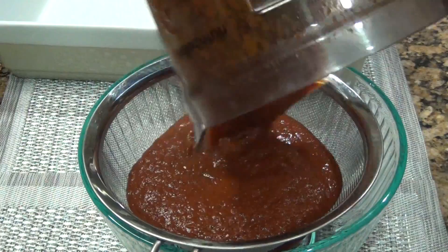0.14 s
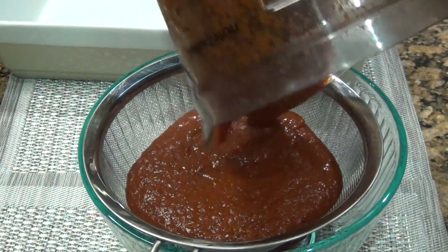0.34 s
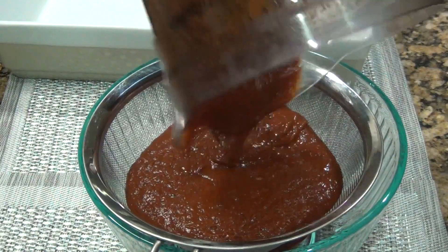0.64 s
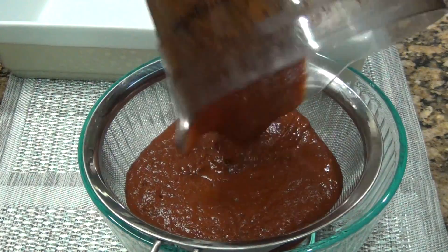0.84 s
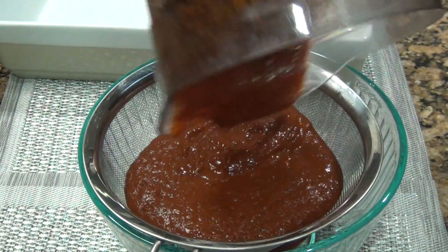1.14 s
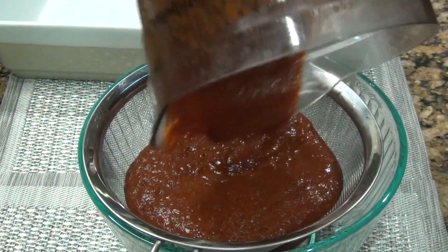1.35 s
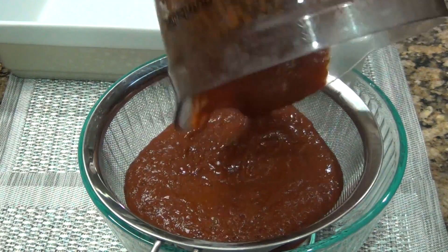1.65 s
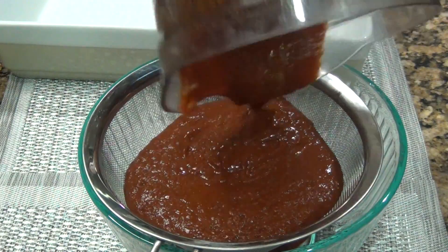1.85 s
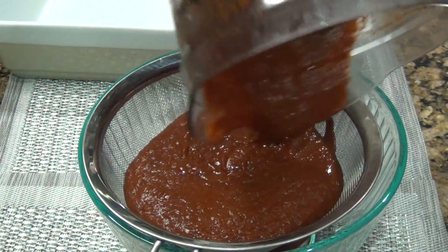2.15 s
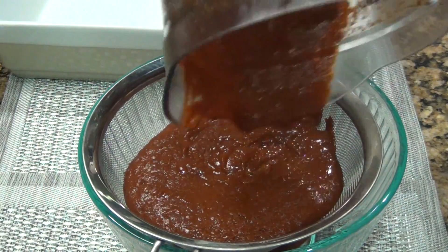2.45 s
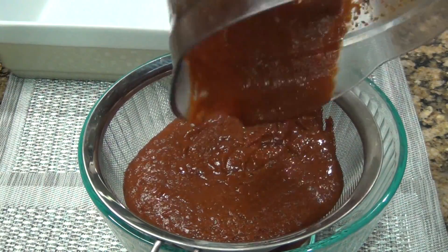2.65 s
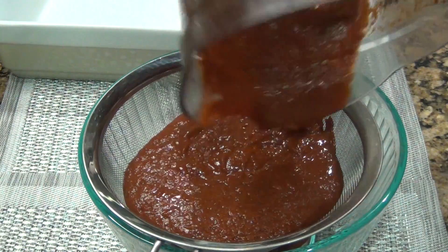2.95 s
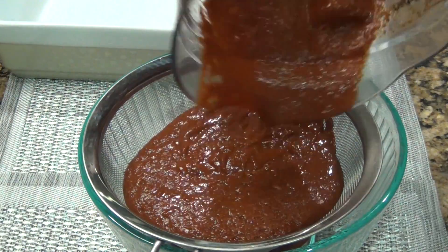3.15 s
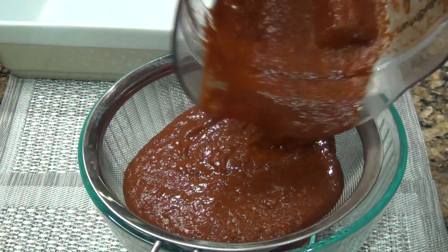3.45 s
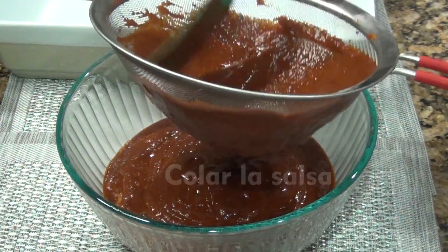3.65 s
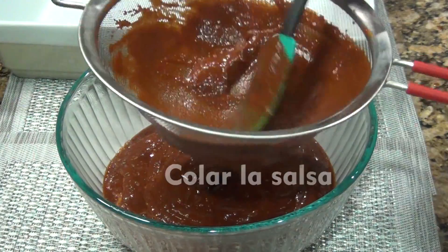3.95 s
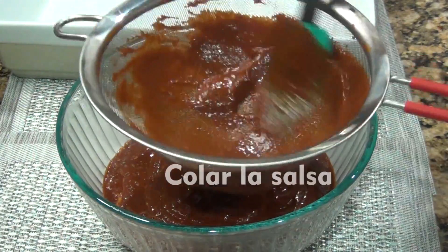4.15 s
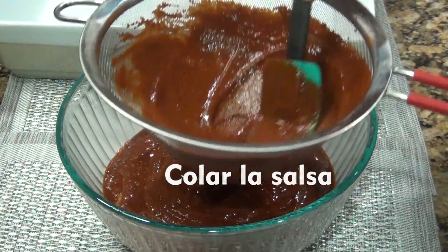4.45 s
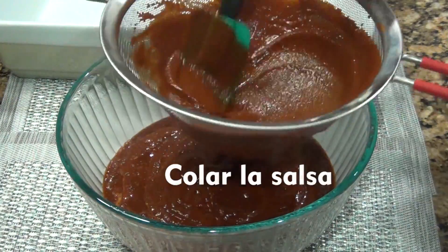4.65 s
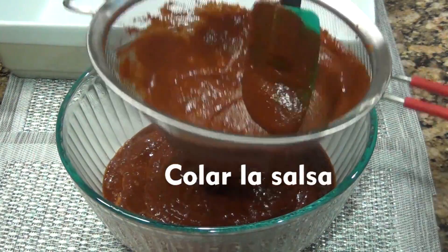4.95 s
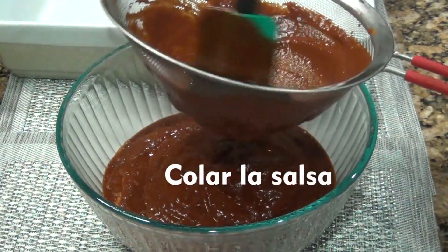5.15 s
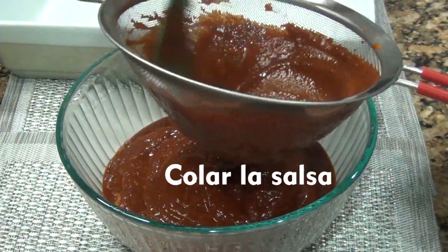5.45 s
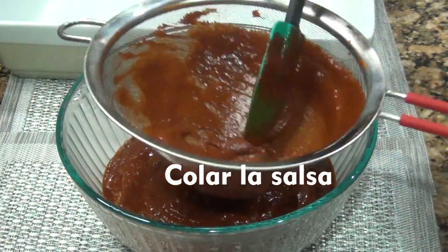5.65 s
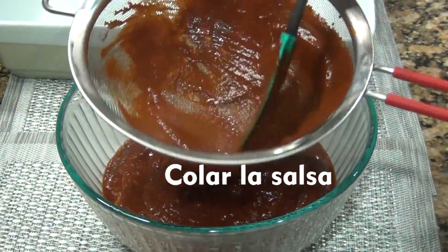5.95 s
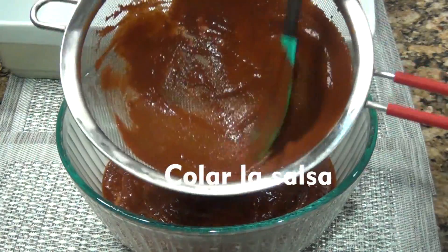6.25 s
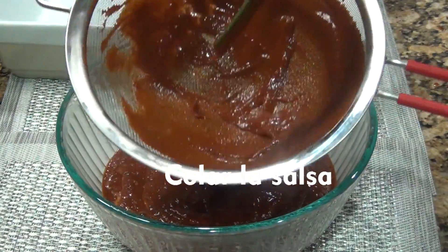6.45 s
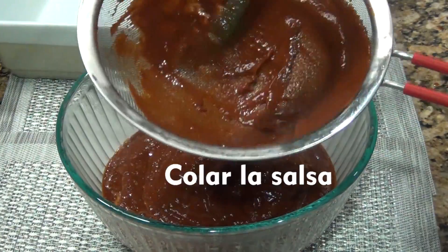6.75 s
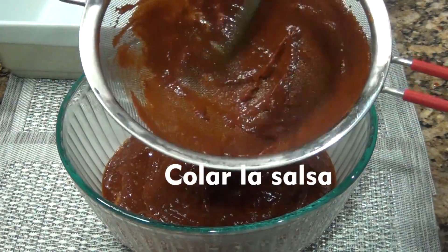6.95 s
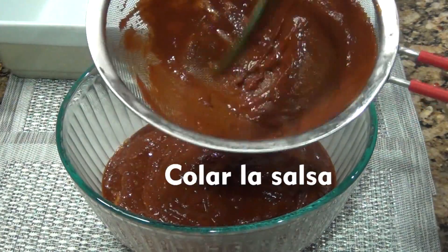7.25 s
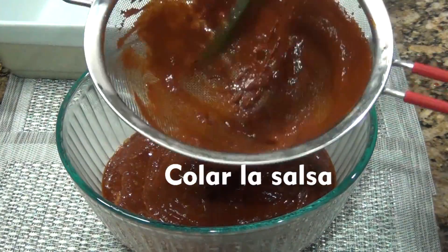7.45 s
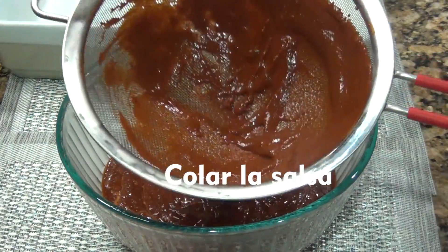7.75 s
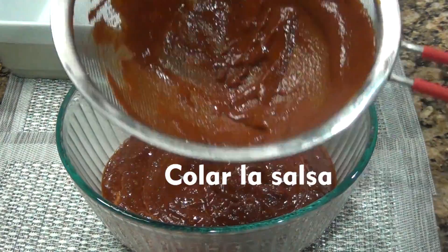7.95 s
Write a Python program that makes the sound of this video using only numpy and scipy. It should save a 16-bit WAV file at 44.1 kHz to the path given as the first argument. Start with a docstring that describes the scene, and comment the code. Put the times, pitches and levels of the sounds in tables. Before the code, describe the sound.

In a small kitchen with a low fan running, a plastic jar of thick sauce is shaken with soft flutters, hollow thumps and quick regular knocks, sauce sloshing and crackling inside. Then a spatula scrapes wetly across a wire strainer in short uneven strokes with fizzing and sticky pops. Finally it raps the metal rim five times, loud and evenly spaced, with brief room echoes. Close microphone.

```python
"""In a small kitchen, thick sauce is shaken out of a plastic blender jar into a wire strainer over a bowl.
The jar knocks and thumps: damped wall modes and a pumped air note; slosh and crackle are resonated noise and clicks.
A spatula rubs the sauce through the mesh in wet strokes, made of click trains under a pressure curve,
and is rapped five times on the rim, which rings in damped modes. A fan runs: coloured noise, duct modes and hum.
Diffuse echoes surround the near sounds; the recorder's gain control turns the level down at the raps."""
import sys
import numpy as np
from scipy import signal
from scipy.fft import rfft, irfft, next_fast_len
from scipy.io import wavfile
from scipy.ndimage import uniform_filter1d, minimum_filter1d

SR = 44100
rng = np.random.default_rng(int(sys.argv[2]) if len(sys.argv) > 2 else 0)


def file_out(sig):
    """Save sig as 16-bit WAV at sys.argv[1]."""
    # one column per channel
    cols = np.atleast_2d(sig).T
    # limit, then scale
    lim = np.clip(cols, -1, 1)
    pcm = np.round(lim * 32767).astype(np.int16)
    wavfile.write(sys.argv[1], SR, pcm)


N = 356769
TIME = np.arange(N) / SR
# the spatula works the sauce between these times
STIR_START_S, STIR_END_S = 3.54, 6.33

# ring of the jar's wall: pitch_hz, level_db
JAR_MODES = [(400, -13.5), (640, -14.5), (938, -3), (1340, -18.5), (1550, -16.5), (1930, -23), (2200, -42)]
# the jar knocks once per shake: start_s, level_db
KNOCKS = [(.749, -39.5), (0.937, -38), (1.12, -30.5), (1.308, -30), (1.493, -32), (1.677, -38.5),
          (1.857, -37), (2.032, -29), (2.212, -31.5), (2.398, -33), (2.583, -29.5), (2.756, -34.5),
          (2.936, -37), (3.127, -43.5)]


def knocks():
    """Modal impact: each shake ends in a gritty contact and a short hollow ring of the jar's wall modes."""
    out, t = np.zeros(N), TIME[:SR // 20]
    grit_spectrum = [(600, 6), (2100, 3.5), (3000, -5.0), (8000, -20.5)]  # (Hz, dB)
    for s, db in KNOCKS:
        ring = np.zeros(len(t))
        for hz, level in JAR_MODES:
            # every blow excites and tunes the modes slightly differently
            level_chance, pitch_chance, phase = rng.standard_normal(3)
            mode = np.sin(2 * np.pi * hz * (1 + 0.009 * pitch_chance) * t + phase)
            ring += from_db(level + 2.9 * level_chance) * mode
        ring = ring * choked(t, 0.016, rise=0.16, fall=0.45)
        grit = noise(grit_spectrum, size=len(t)) * choked(t, .012, rise=0.098, fall=0.99)
        add(out, s, from_db(db) * (ring + from_db(-16) * grit))
    return out


# soft blows on the jar: start_s, level_db, pitch_hz of the air note, length_s, rattle_db re level
THUMPS = [(0.017, -48, 400, 0.016, -16), (0.423, -43, 406, 0.025, -21), (0.797, -21.5, 404, 0.032, -12),
          (1.079, -36, 332, 0.017, -7.5), (3.187, -27.5, 435, 0.044, -3),
          (3.388, -21.5, 410.5, 0.024, -13.5)]
# the jar is first rocked gently and evenly; its air is pumped at every turn
ROCK_START_S, ROCK_TURN_S, ROCK_DB = .073, .098, -49
# once it knocks, it swings back a little after each knock but the last
BACKSWING_S, BACKSWING_DB = 0.11, -48
# the soft thump of a turn
TURN_HZ, TURN_LENGTH_S, TURN_RATTLE_DB = 400, .021, -4


def jar_blows():
    """Sequence of excitations: the firm blows, and a soft one at each turn of the shaken jar."""
    rocking = [(ROCK_START_S + k * ROCK_TURN_S, ROCK_DB) for k in range(7)]
    backswings = [(s + BACKSWING_S, BACKSWING_DB) for s, _ in KNOCKS[:-1]]
    return THUMPS + [(s, db, TURN_HZ, TURN_LENGTH_S, TURN_RATTLE_DB) for s, db in rocking + backswings]


def thumps():
    """Cavity resonance: a soft blow rattles the jar and pumps its air, whose note sags and leaves a hollow ring."""
    out, t = np.zeros(N), TIME[:SR // 4]
    # spectra (Hz, dB)
    hollow_spectrum = [(360, -24.5), (420, 1.5), (490, 1.5), (560, -12.5), (700, -21.5)]
    thud_spectrum = [(40, -21.5), (75, -8.0), (110, 8.5), (160, -13.5), (215, 4.5), (280, -7.5)]
    rattle_spectrum = [(350, -0.5), (520, 4.5), (650, 1.5), (900, -4.5), (1200, 0.5), (1550, -7.0),
                       (1950, -5.5), (2800, -16.0), (8000, -30.5)]
    for s, db, hz, length, rattle_db in jar_blows():
        # the pitch glides from 1.16 to 0.97 of the listed one
        phase = 2 * np.pi * np.cumsum(hz * (0.97 + 0.19 * np.exp(-t / 0.0042))) / SR
        note = 1.05 * np.sin(phase) * choked(t, length, rise=0.36, fall=0.31)
        hollow = noise(hollow_spectrum, size=len(t)) * np.exp(-t / 0.058) * np.minimum(t / length, 1)
        thud = noise(thud_spectrum, size=len(t)) * choked(t, 0.05, rise=0.11, fall=0.61)
        rattle = noise(rattle_spectrum, size=len(t)) * choked(t, length * 0.67, rise=0.19, fall=0.7)
        blow = note + from_db(-14.0) * hollow + from_db(-26.5) * thud + from_db(rattle_db) * rattle
        add(out, s, from_db(db) * blow)
    return out


# slosh inside the jar: start_s, level_db
SLOSH = [(0, -66.5), (1.0, -58), (2.8, -60.5), (3.5, -61.5), (3.55, -90)]
# turns of the shaken jar, and the time of one of them
TURNS_PER_S, FULL_SWING_S = 10.95, 1.32
# sauce creeping from the jar crackles less and less as it empties; the level is that at 0 s
OOZE_DB, OOZE_FADE_DB_PER_S = -70.5, 6
# one big lump slides off: its middle, half its length, its swish and its crackle
LUMP_S, LUMP_HALF_S, LUMP_SWISH_DB, LUMP_CRACKLE_DB = 0.73, 0.081, -59.5, -66.5


def pouring():
    """Amplitude modulation: sauce sloshes and glugs with each turn, crackles creeping out, and a lump swishes off."""
    swing = 1 + .7 * np.cos(2 * np.pi * TURNS_PER_S * (TIME - FULL_SWING_S))
    slosh = rms_one(resonate(resonate(rng.standard_normal(N), 390, 53), 448, 120))
    glugs = from_db(-3.5) * squelches(per_s=70, cycles=17)
    moving = gains(SLOSH)[0] * (slosh + glugs) * swing
    lump = np.exp(-((TIME - LUMP_S) / LUMP_HALF_S) ** 2)
    swish_spectrum = [(2500, -10), (4200, -2), (6000, -13.5), (14000, -16)]  # (Hz, dB)
    swish = from_db(LUMP_SWISH_DB) * noise(swish_spectrum) * lump
    ooze = from_db(OOZE_DB - OOZE_FADE_DB_PER_S * TIME) * (TIME < STIR_START_S)
    crackle = (ooze + from_db(LUMP_CRACKLE_DB) * lump) * wet_crackle(per_s=280, spread_db=3.5, cycles=5)
    return moving + crackle + swish


# spectrum of the wet fizz: pitch_hz, level_db
FIZZ = [(1500, -8), (3000, 8.5), (5000, 2.5), (8000, 3.5), (11500, -1.5), (13000, -9.5), (16000, -18)]


def wet_crackle(per_s, spread_db, cycles):
    """Impulsive excitation: tiny films of sauce snap, each at one of twelve pitches; rms 1."""
    return colour(pitched_clicks(grains(per_s, spread_db), np.geomspace(2500, 14000, 12), cycles), FIZZ)


# spectrum of the rub on the mesh: pitch_hz, level_db
RUB = [(200, -32.5), (350, -10), (570, -8.5), (870, 1), (1060, -1.5), (1380, -5.5), (1950, -9),
       (2550, -16.5), (3300, -17.5), (5000, -25), (8000, -36.5)]


def squelches(per_s, cycles):
    """Bubble resonance: air pockets in the sauce pop with short low notes; rms 1."""
    return colour(pitched_clicks(grains(per_s, spread_db=1.5), np.geomspace(400, 2400, 14), cycles), RUB)


# a stroke bites, eases as the sauce gives way, and lets go
STROKE_ATTACK_S, STROKE_SAG_DB_PER_S, STROKE_RELEASE_DB_PER_S = 0.027, 21, 229


def pressure(start, length):
    """Force envelope of one stroke: a smooth rise, a slow sag, a quick release."""
    t = np.maximum(TIME - start, 0)
    rise = np.sin(np.pi / 2 * np.minimum(t / STROKE_ATTACK_S, 1)) ** 2
    return rise * from_db(-STROKE_SAG_DB_PER_S * t - STROKE_RELEASE_DB_PER_S * np.maximum(t - length, 0))


# spectrum of the flexing basket: pitch_hz, level_db
PUSH = [(90, -24), (180, -9.5), (330, 1.5), (480, 2.5), (700, -2)]
# spatula strokes: start_s, length_s, rub_db on the mesh, push_db on the basket, fizz_db of the wet sauce
STROKES = [(3.685, .06, -41, -47.5, -51), (3.741, .078, -36, -54, -56.5), (3.956, .04, -54, -55.5, -67),
           (4.165, 0.12, -40, -68, -58), (4.296, 0.084, -45, -61, -57), (4.423, 0.06, -43, -62, -55.5),
           (4.567, .11, -41.5, -61.5, -55), (4.784, 0.067, -53, -64, -60.5), (5.177, 0.11, -53.5, -59, -62),
           (5.255, 0.23, -45.5, -56.5, -59), (5.491, .175, -41, -53, -58.5),
           (5.888, 0.055, -34.5, -57, -50.5), (5.95, 0.036, -43, -61, -66), (6.203, 0.058, -39, -59, -55)]
# between strokes the blade slides lightly through the sauce
STIR_RUB_DB, STIR_FIZZ_DB = -61, -72


def strokes():
    """Friction excitation: the blade skips over wires, flexes the basket and squeezes sauce and air through holes."""
    # strokes that overlap add in power
    power = sum(np.outer(from_db(levels), pressure(s, length)) ** 2 for s, length, *levels in STROKES)
    rub, push, fizz = np.sqrt(power)
    stirring = during(STIR_START_S, STIR_END_S, fade=.03)
    rub = np.hypot(rub, from_db(STIR_RUB_DB) * stirring)
    fizz = np.hypot(fizz, from_db(STIR_FIZZ_DB) * stirring)
    grip = from_db(1.1 * drift(70))
    skips = from_db(-5.0) * colour(grains(per_s=2500, spread_db=2.5), RUB)
    wires = skips + from_db(-7.5) * squelches(per_s=260, cycles=18)
    basket = colour(grains(per_s=900, spread_db=3.5), PUSH)
    spit = wet_crackle(per_s=2800, spread_db=2.6, cycles=4)
    return grip * (rub * wires + push * basket + fizz * spit)


# spatula bumps and catches on the mesh: start_s, level_db, decay_s to 1/e, treble_db re level
BUMPS = [(3.538, -33.5, 0.012, -14), (3.548, -33, 0.014, -26), (3.6933, -34.5, 0.0014, -22),
         (3.706, -27.5, 0.00065, 2), (3.72, -41, 0.008, 0.5), (3.762, -35, 0.0037, -6),
         (4.268, -39.5, .008, -15), (4.806, -42.5, 0.025, -11.5), (5.531, -41, .016, -22),
         (5.693, -39.5, 0.0053, -22), (5.861, -36.5, 0.0023, -25), (5.882, -36, 0.0028, -24),
         (6.155, -40, 0.0028, -15)]


def bumps():
    """Stick and release: the blade catches and lets go in a burst of the rub's spectrum, dying fast."""
    out, t = np.zeros(N), TIME[:SR // 6]
    for s, db, decay, treble_db in BUMPS:
        burst = noise(RUB, size=len(t)) + from_db(treble_db) * noise(FIZZ, size=len(t))
        add(out, s, from_db(db) * burst * np.exp(-t / decay))
    return out


# the larger sticky bubbles burst: start_s, level_db, pitch_hz
POPS = [(0.5865, -44, 5770), (0.6843, -45, 4360), (1.6924, -40, 4680), (2.031, -46, 4660),
        (2.161, -44, 6130), (2.5584, -42, 6300), (2.708, -46, 4440), (3.195, -34.5, 4380),
        (3.357, -44, 8000), (4.0022, -38, 7700), (4.0573, -39.5, 3840), (4.1025, -42.5, 4200),
        (4.3273, -44, 3640), (4.395, -46, 11100), (4.4964, -34, 5900), (4.7398, -39, 3580),
        (5.1565, -42.5, 3510), (5.8062, -44.5, 10100), (6.2734, -40.5, 5840)]


def pops():
    """Bubble burst: a tick around the bubble's own pitch and a few rising cycles."""
    out, t = np.zeros(N), TIME[:SR // 40]
    for s, db, hz in POPS:
        chirp = np.sin(2 * np.pi * hz * t * (1 + 5 * t)) * np.exp(-t / 0.002)
        tick = rms_one(resonate(rng.standard_normal(len(t)), hz, 0.65 * hz)) * np.exp(-t / 0.0025)
        add(out, s, from_db(db) * (.5 * chirp + 0.55 * tick))
    return out


# tiny bubbles burst at random until the stirring ends; the level is that at 0 s
TICKS_PER_S, TICKS_DB, TICKS_FADE_DB_PER_S = 14, -71, 2.8


def ticks():
    """Random point process: tiny bubbles burst one by one, high, and fainter as the froth is used up."""
    clicks, dealt = grains(TICKS_PER_S, spread_db=1.5), rng.integers(0, 6, N)
    pitches = np.geomspace(4000, 13000, 6)
    snaps = sum(resonate(clicks * (dealt == k), hz, 1500) for k, hz in enumerate(pitches))
    return from_db(TICKS_DB - TICKS_FADE_DB_PER_S * TIME) * rms_one(snaps) * (TIME < STIR_END_S)


# damped ring of rim and spatula, over the longer low swing of the handle: pitch_hz, width_hz, level_db
RIM_MODES = [(80, 29, -5), (150, 20, -0.5), (316, 39, 2), (673, 350, -3), (1200, 410, 4), (1820, 430, 1.5),
             (2850, 890, -7), (3700, 330, 0), (4730, 760, -1.5), (6650, 1250, 1), (8160, 1100, 1.5),
             (11230, 2400, -7)]
# spectrum of the short noise burst that smears the direct crack: pitch_hz, level_db
CRACK = [(100, -1), (8000, 1.5), (12000, 2), (16000, 4)]
# raps on the rim: start_s, level_db of the blow, clack_db added to the spatula's middle modes
RAPS = [(6.6402, 17, -8), (6.8472, 14, -2.5), (7.0414, 14.5, -1), (7.2197, 16.5, -2), (7.4145, 15, -2.5)]


def raps():
    """Impulse response of damped modes: the clean crack, and the crack smeared by a short noise burst for the
    direct sound."""
    clean, chattering, t = np.zeros(N), np.zeros(N), TIME[:SR // 8]
    impulse = 1.0 * (t == 0)
    for s, db, clack_db in RAPS:
        crack = np.zeros(len(t))
        for k, (hz, width, level) in enumerate(RIM_MODES):
            # the spot that lands on the rim decides how much the middle modes speak
            gain = from_db(db + level + clack_db * (1000 < hz < 2500))
            crack += (-1) ** k * gain * resonate(impulse, hz, width)
        chatter = noise(CRACK, size=len(t)) * np.exp(-t / .0019)
        add(clean, s, from_db(3) * crack)
        add(chattering, s, signal.fftconvolve(crack, chatter / np.linalg.norm(chatter)))
    return clean, chattering


# spectrum of the fan's air: pitch_hz, level_db
AIR = [(18, -52.5), (30, -13.5), (71, -6.5), (252, -7), (374, -7.5), (461, -2), (844, 0), (1160, -7.5),
       (1320, 2.5), (1460, -9.5), (1860, 0), (2230, -9), (3310, -11.5), (14000, -19), (16000, -23)]
# level of the fan's air over time: start_s, level_db
AIR_LEVEL = [(0, -57), (3.5, -59), (3.6, -56), (6.5, -58.5), (8.09, -58)]
# duct resonances: pitch_hz, width_hz, level_db
FAN_MODES = [(845, 28, -65), (1084, 89, -68), (1309, 120, -60.5), (1815, 230, -66.5), (3266, 65, -73.5)]
# mains hum: pitch_hz, level_db
HUM = [(60, -81), (120, -80)]


def background():
    """Broadband flow noise with duct resonances, mains hum and, from 3.54 s, a thin wavering whine."""
    air = gains(AIR_LEVEL)[0] * noise(AIR)
    duct = sum(from_db(db) * rms_one(resonate(rng.standard_normal(N), hz, width)) for hz, width, db in FAN_MODES)
    hum = sum(from_db(db) * np.sin(2 * np.pi * hz * TIME) for hz, db in HUM)
    whine_hz = np.interp(TIME, [3.54, 8], [14580, 14200]) + 60 * drift(9) + 170 * drift(900)
    whine = from_db(-72.5) * (TIME > 3.54) * np.sin(2 * np.pi * np.cumsum(whine_hz) / SR)
    return air + duct + hum + whine


# reverberation of the room: pitch_hz, t60_s, echo_db
KITCHEN = [(151.4, 0.65, -14), (400, 0.53, -9), (1000, 0.42, -9.5), (2500, 0.4, -10), (6020, 0.4, -8),
           (8970, 0.33, -13), (14000, 0.18, -10.5)]


def kitchen(x):
    """Diffuse reverberation: echoes arrive a few milliseconds late and die band by band."""
    t, response = TIME[:SR // 2], 0
    hz, t60, echo_db = np.transpose(KITCHEN)
    edges = 60 * 2 ** np.arange(0, 8.5, 2 / 3)  # bands of two thirds of an octave
    for low, high in zip(edges, edges[1:]):
        centre = np.log(low * high) / 2
        band_filter = signal.butter(2, [low, high], "band", fs=SR, output="sos")
        band = signal.sosfilt(band_filter, rng.standard_normal(len(t)))
        tail = band * from_db(-60 * t / np.interp(centre, np.log(hz), t60)) * (t > .005)
        # energy in proportion to bandwidth
        even = np.sqrt(2 * (high - low) / SR / np.sum(tail ** 2))
        response = response + tail * from_db(np.interp(centre, np.log(hz), echo_db)) * even
    return signal.fftconvolve(x, response)[:N]


def from_db(db):
    """Logarithmic level: decibels to gain."""
    return 10 ** (np.asarray(db) / 20)


def rms_one(x):
    """Power normalisation: scale to rms 1."""
    return x / np.sqrt(np.mean(x ** 2) + 1e-20)


def gains(rows):
    """Level interpolation: one gain curve per dB column, practically silent outside the rows."""
    s, *columns = np.transpose(rows)
    return [from_db(np.interp(TIME, s, c, left=-150, right=-150)) for c in columns]


def colour(x, spectrum):
    """Spectral shaping: filter by a spectrum that falls 20 dB per octave beyond its ends; rms 1."""
    hz, db = np.transpose(spectrum)
    size = next_fast_len(len(x))
    octave = np.log2(np.fft.rfftfreq(size, 1 / SR) + 1)
    beyond = np.abs(octave - np.clip(octave, np.log2(hz[0]), np.log2(hz[-1])))
    shape = from_db(np.interp(octave, np.log2(hz), db) - 20 * beyond)
    return rms_one(irfft(rfft(x, size) * shape, size)[:len(x)])


def noise(spectrum, size=N):
    """Filtered white noise, rms 1."""
    return colour(rng.standard_normal(size), spectrum)


def drift(rate):
    """Slow random modulation of rms 1, with rate knots per second."""
    knots = rng.standard_normal(int(N / SR * rate) + 2)
    return rms_one(np.interp(TIME * rate, np.arange(len(knots)), knots))


def resonate(x, hz, width_hz):
    """Damped oscillator: one two-pole resonance with gain 1 on top."""
    r = np.exp(-np.pi * width_hz / SR)
    zeros = np.array([1, 0, -1]) * (1 - r * r) / 2
    poles = [1, -2 * r * np.cos(2 * np.pi * hz / SR), r * r]
    return signal.lfilter(zeros, poles, x + 1e-18)


def grains(per_s, spread_db):
    """Random impulse train: clicks of very uneven size and either sign."""
    sizes = from_db(spread_db * np.minimum(rng.exponential(1, N), 4))
    return (rng.random(N) < per_s / SR) * sizes * rng.choice([-1, 1], N)


def pitched_clicks(clicks, pitches, cycles):
    """Resonator bank: each click is dealt to one pitch; width is the pitch over cycles."""
    dealt = rng.integers(0, len(pitches), N)
    return sum(resonate(clicks * (dealt == k), hz, hz / cycles) for k, hz in enumerate(pitches))


def add(out, s, sound):
    """Superposition: mix a sound in at time s."""
    at = int(s * SR)
    out[at:at + len(sound)] += sound[:N - at]


def choked(t, length, rise, fall):
    """Damped envelope: swells, sags, then is stopped by hand and sauce; rise and fall are shares of length."""
    u = t / length
    swell = np.sin(np.pi / 2 * np.clip(u / rise, 0, 1)) ** 2
    return swell * np.clip((1 - u) / fall, 0, 1) * np.exp(-.4 * u)


def during(start, end, fade):
    """Gating: 1 between two times, with a short fade inside each end."""
    return np.clip(np.minimum(TIME - start, end - TIME) / fade, 0, 1)


def scene():
    """Superposition of direct sound, room echoes and background."""
    near = thumps() + knocks() + pouring() + strokes() + bumps() + pops() + ticks()
    clean_raps, chattering_raps = raps()
    return (near + chattering_raps + kitchen(near + clean_raps) + background())[None]


def gain_control(x, threshold_db, release_db_per_s):
    """Dynamic range limiting: the gain dives just ahead of a loud sound and creeps back."""
    level_db = 10 * np.log10(np.abs(uniform_filter1d(x[0] ** 2, SR // 200)) + 1e-12)
    over = np.maximum(level_db - threshold_db, 0)
    # the largest excess is held and released at a steady rate
    held = np.maximum.accumulate(over + release_db_per_s * TIME) - release_db_per_s * TIME
    return x * from_db(uniform_filter1d(minimum_filter1d(-held, SR // 40), SR // 200))


CUTOFF_HZ = 16000


def record(dry):
    """Gain control, then band limiting by a steep elliptic low-pass."""
    levelled = gain_control(dry, threshold_db=-23.0, release_db_per_s=0.2)
    low_pass = signal.ellip(10, .1, 80, CUTOFF_HZ, fs=SR, output="sos")
    return signal.sosfilt(low_pass, levelled)


dry = scene()
out = record(dry)
file_out(out)
```